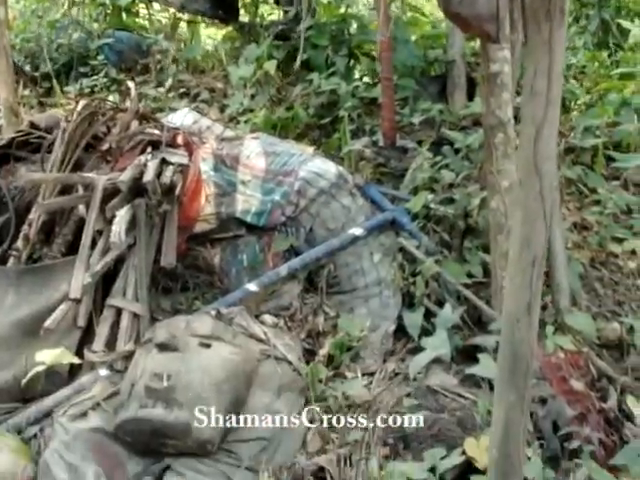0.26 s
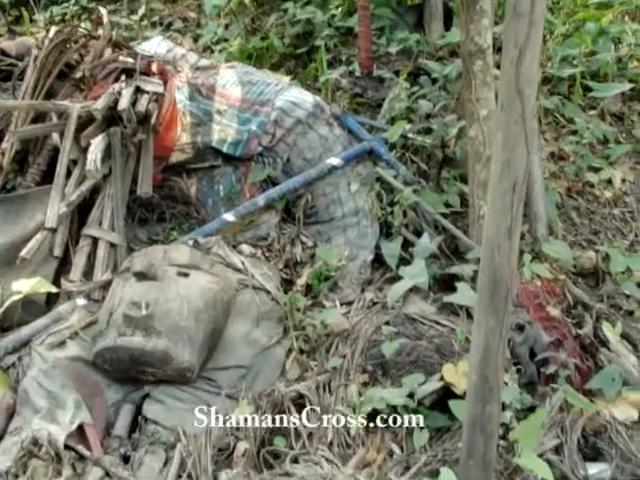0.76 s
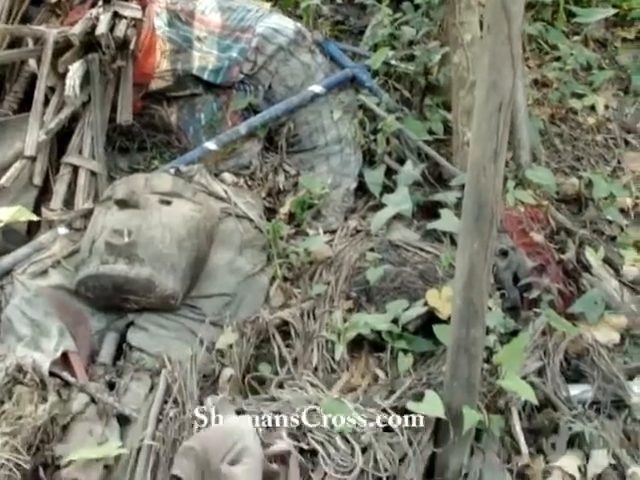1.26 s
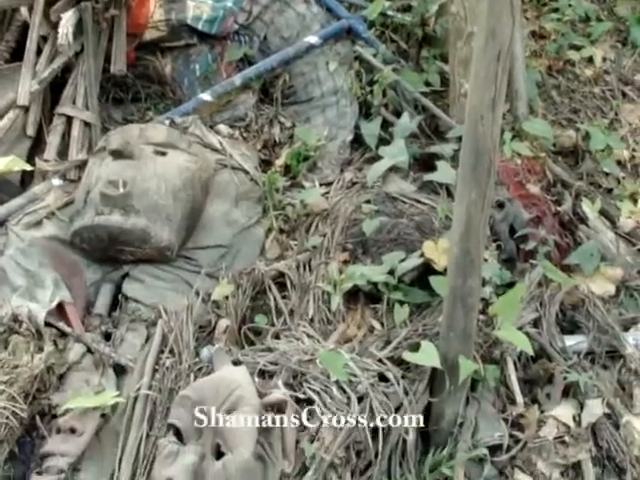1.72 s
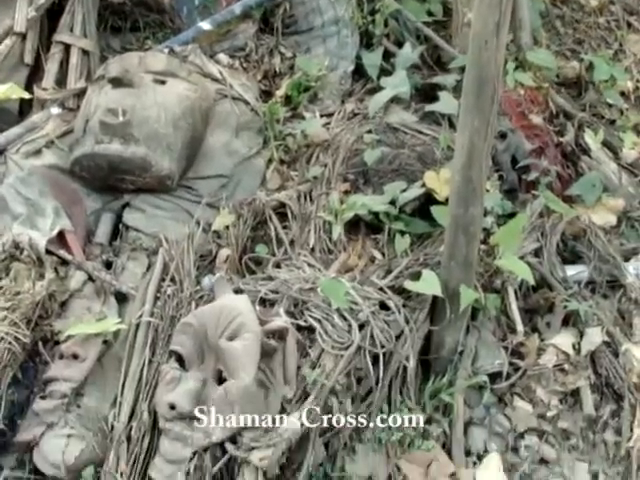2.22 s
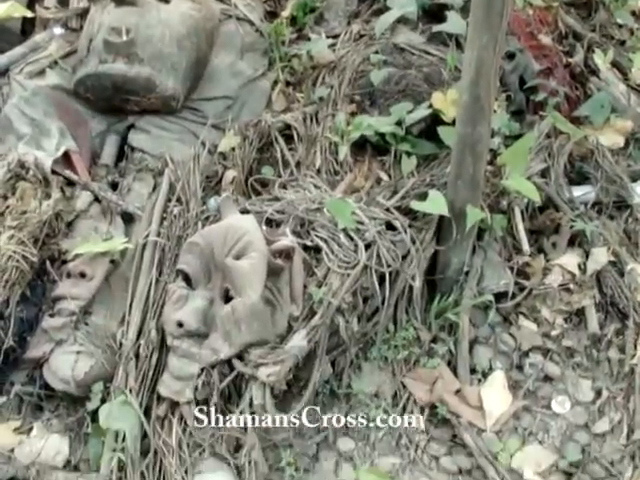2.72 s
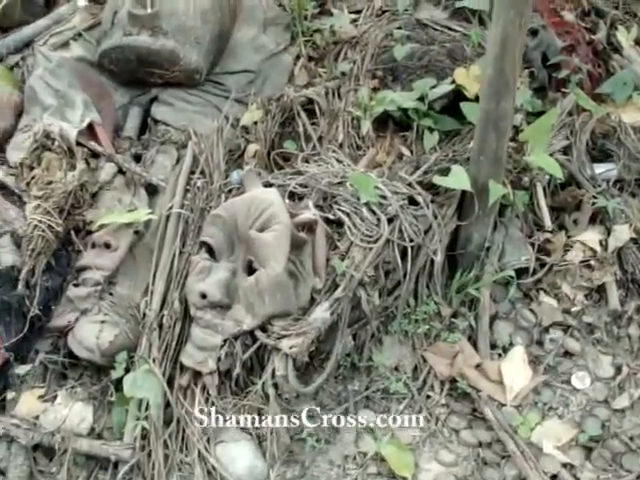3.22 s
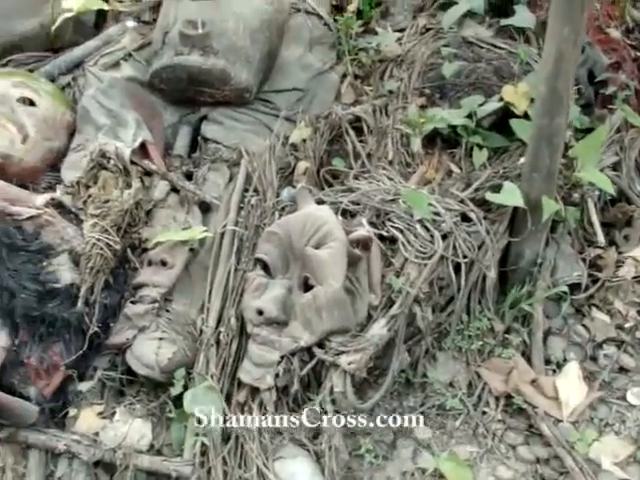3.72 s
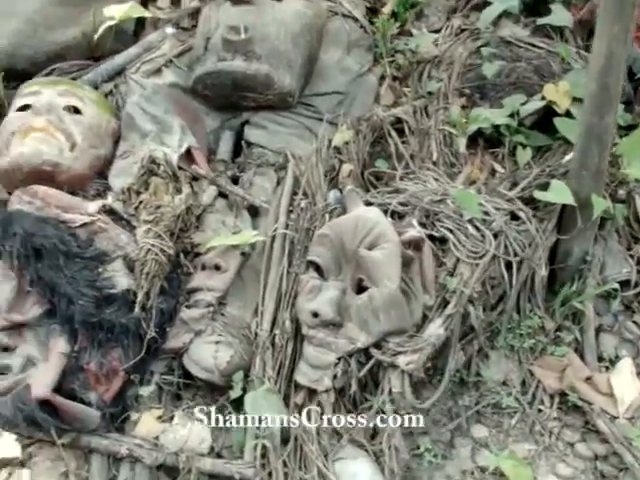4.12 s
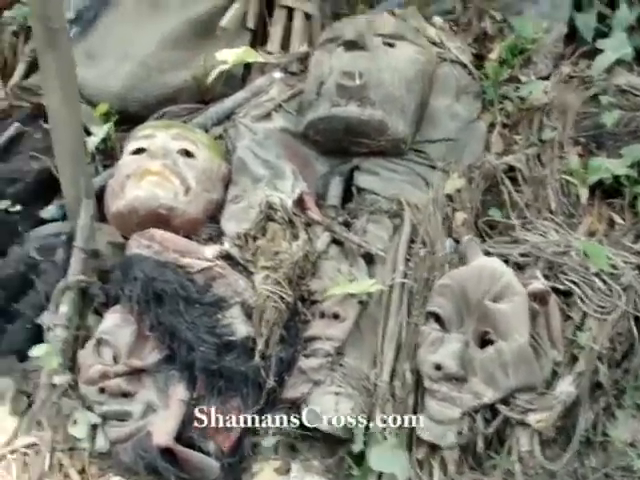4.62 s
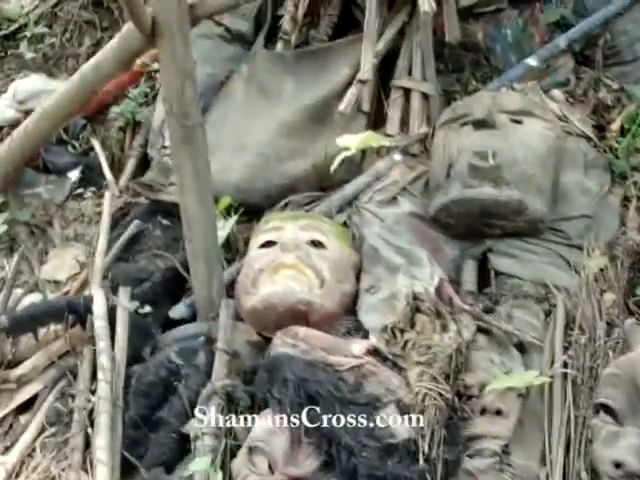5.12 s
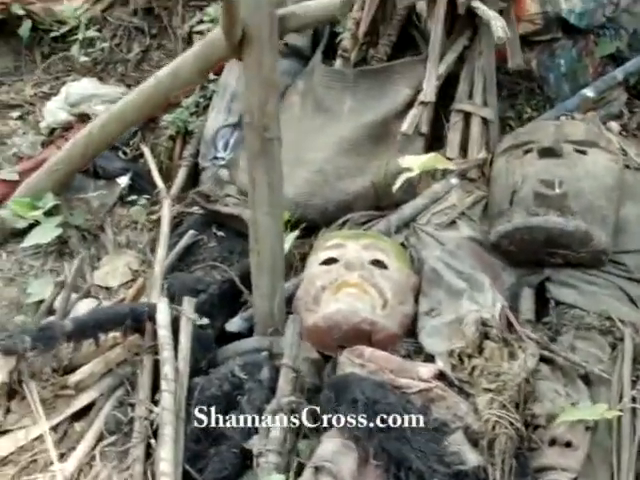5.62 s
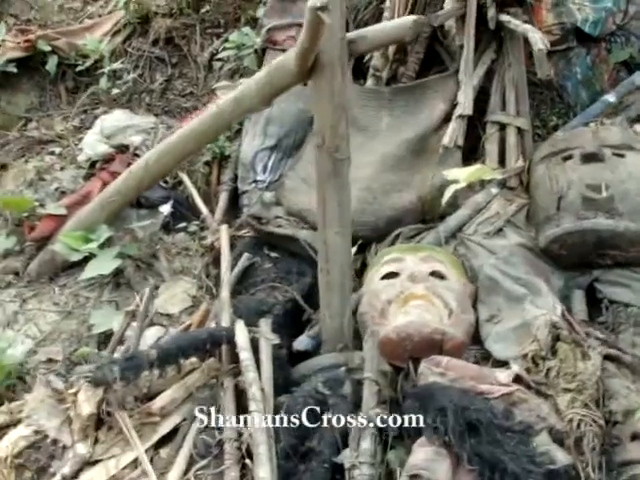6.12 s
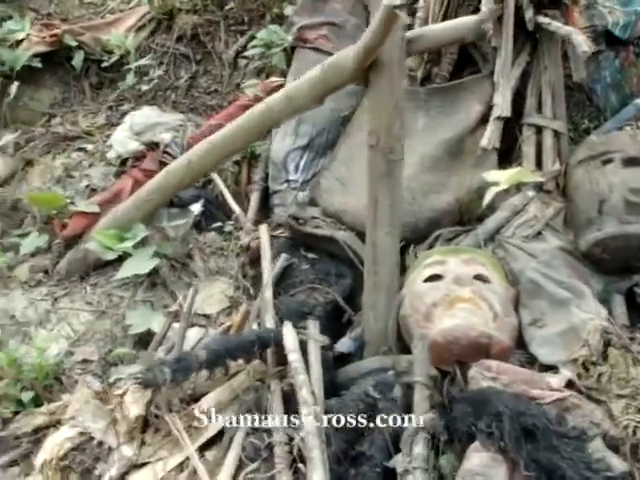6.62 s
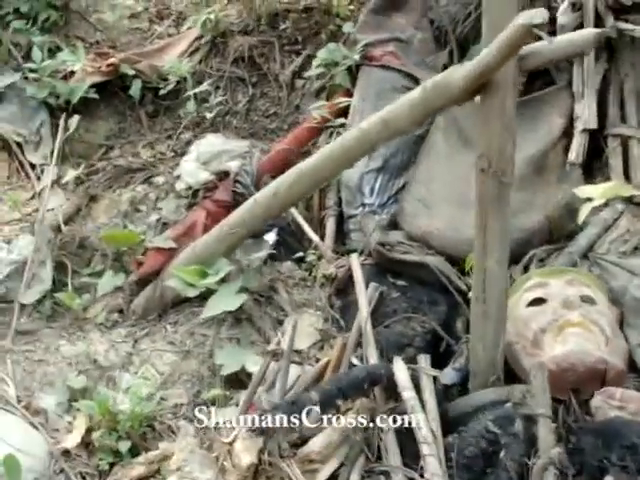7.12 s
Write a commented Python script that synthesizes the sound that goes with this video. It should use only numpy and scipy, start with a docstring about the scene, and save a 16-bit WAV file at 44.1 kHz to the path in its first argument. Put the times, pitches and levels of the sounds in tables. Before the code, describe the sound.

A bird repeats clear falling whistles outdoors while others warble and a near one squawks, with low wind thumps over soft leaf hiss.

```python
"""Birds in leafy undergrowth

A bird repeats a falling whistle, others warble and sweep, and a near one squawks and chips.
Whistles are wavering near sines, harsh calls are jittered harmonics, and sparse echoes scatter both.
A light breeze thumps a small handheld microphone in low puffs over the shaped noise of leaves.
An insect band is throbbing narrow noise, a faint buzz is evenly spaced rings, twig ticks are brief bursts."""
import sys
import numpy as np
from scipy import signal
from scipy.io import wavfile
from scipy.ndimage import uniform_filter1d

SR = 44100
rng = np.random.default_rng(int(sys.argv[2]) if len(sys.argv) > 2 else 0)


def bounce(signal):
    """Save signal as a 16-bit WAV file at the path given by the first command-line argument."""
    frames = np.transpose(np.atleast_2d(signal))
    limited = np.clip(frames, -1, 1)
    pcm = np.round(limited * 32767).astype(np.int16)
    wavfile.write(sys.argv[1], SR, pcm)


N = 324576

# Falling whistles. Each row: start in seconds, length in seconds, top pitch in Hz,
# level in dB before onset and drop, duration of the loud part in seconds.
FALLING_WHISTLES = [(-.13, 0.25, 3427, -33.5, 0.14), (0.272, 0.27, 3383, -34.5, 0.16),
                    (0.681, 0.21, 3320, -35.5, 0.13), (1.221, 0.19, 3370, -50, 0.11),
                    (3.419, 0.28, 3410, -51, 0.11), (3.816, 0.23, 3280, -40.5, 0.11),
                    (4.209, 0.249, 3250, -35, 0.1), (4.621, 0.27, 3347, -36.5, 0.12),
                    (5.035, 0.14, 3324, -38, 0.098)]
FALL_END_HZ, FALL_SETTLE_S = 2727, 0.12  # limit and time constant of the glide
FALL_DROP_DB = 12.5  # softer after the loud part

# Warbled notes. Each row: start in seconds, length in seconds, first, middle and last pitch in Hz,
# level in dB at the middle, swell in dB from first to last.
WARBLED_NOTES = [(0.745, 0.14, 1690, 1720, 1675, -60.5, 10), (2.552, 0.046, 2310, 2410, 2200, -51.5, -8),
                 (3.064, 0.07, 2780, 2543, 2580, -45, -3), (3.501, 0.093, 2220, 1950, 2500, -53, 3),
                 (3.803, 0.16, 2295, 2365, 2270, -52.5, 3), (3.927, 0.077, 2286, 2120, 2370, -50.5, -3),
                 (4.511, 0.12, 1301, 1617, 1824, -52, -7), (4.6, 0.23, 1790, 1797, 1603, -47.5, -6),
                 (4.576, 0.09, 1816, 2120, 2300, -51.5, -1), (5.046, 0.071, 1710, 2110, 2580, -52.5, -11),
                 (5.303, 0.069, 2086, 2107, 2210, -51, -3), (5.398, 0.12, 2220, 2260, 2290, -55, -15),
                 (5.401, 0.11, 1950, 1990, 1960, -54, 3), (5.474, 0.34, 3915, 3470, 3105, -58, -13),
                 (5.816, .21, 3090, 3050, 2830, -57, 13), (5.829, 0.051, 1740, 1850, 1560, -47, -2),
                 (5.945, 0.063, 2155, 1904, 2220, -45.5, 4), (6.004, 0.056, 2095, 2380, 2360, -47.5, 13),
                 (6.121, 0.028, 1950, 1990, 2180, -48, 17), (6.148, 0.052, 2618, 2673, 2390, -35, 7),
                 (6.286, 0.06, 1930, 1720, 2070, -47.5, 3), (6.353, 0.065, 2030, 2118, 1873, -40.5, 1),
                 (6.404, .022, 4350, 4430, 4120, -49, -1), (6.434, 0.097, 2010, 2394, 2360, -47, -16),
                 (6.631, 0.061, 1576, 1706, 1650, -54, -9), (6.812, 0.066, 2950, 3115, 3405, -49.5, 17),
                 (6.875, .075, 3380, 3360, 3400, -55.5, 0), (6.858, 0.056, 1600, 1724, 1550, -51, 5),
                 (7.03, 0.12, 2510, 2765, 3130, -50, 10), (7.147, 0.09, 3034, 3210, 3250, -47, -20),
                 (7.186, 0.052, 2236, 1950, 1580, -47.5, 4), (7.228, 0.11, 3950, 3700, 3570, -53.5, 0)]
NOTE_ENDS_DB = 0.5  # both ends are raised this much over the middle, apart from the swell

# Distant sweeps and peeps. Each row: start in seconds, length in seconds, from Hz, to Hz, level in dB.
DISTANT_SWEEPS = [(-.01, 0.029, 4920, 6570, -47), (0.228, 0.036, 4400, 6660, -49.5),
                  (0.458, 0.05, 4400, 6580, -52), (0.643, 0.025, 4380, 5760, -51.5),
                  (0.663, .045, 4700, 3400, -53), (0.934, 0.033, 4600, 6170, -52),
                  (1.14, 0.041, 3750, 6540, -51), (1.298, 0.035, 3900, 6500, -53),
                  (1.482, 0.051, 4290, 6800, -52.5), (4.735, 0.06, 5050, 6100, -54),
                  (0.314, 0.14, 2045, 2030, -56), (0.413, .13, 2250, 2290, -58.5),
                  (1.019, 0.061, 3476, 3120, -56), (1.324, 0.056, 1925, 1950, -63),
                  (1.667, 0.028, 3990, 4010, -49.5), (1.764, 0.087, 2220, 2370, -58.5),
                  (1.959, 0.046, 3890, 4720, -56.5), (2.33, .05, 5170, 5800, -58),
                  (2.4, .07, 2240, 2160, -64), (3.026, 0.05, 2470, 2160, -54),
                  (4.883, 0.17, 6520, 6150, -68), (5.604, 0.097, 3190, 2980, -65.5),
                  (6.191, 0.11, 5250, 4860, -68), (6.817, 0.072, 5270, 5150, -62),
                  (6.924, 0.027, 2700, 2670, -58), (7.326, .04, 4900, 5500, -59)]
# Trills of five upstrokes. Each row: start in seconds, starting pitch in Hz, level in dB.
DISTANT_TRILLS = [(1.909, 2460, -54), (2.318, 2260, -51.5)]

# Strength of the breeze. Each row: time in seconds, relative puff level in dB.
BREEZE_STRENGTH = [(0, -68.5), (.25, -54.5), (.86, -80.5), (.95, -43.5), (1.7, -43), (2.6, -53),
                   (3.25, -58), (3.6, -45), (3.85, -53.5), (4.3, -44), (5.2, -53.5), (5.5, -59),
                   (5.65, -84), (6.0, -60), (6.2, -70), (6.62, -56), (6.85, -80), (7.2, -50.5), (7.36, -54)]
# Strong puffs. Each row: start in seconds, level of the first eddy in dB, cycle rate in Hz.
STRONG_PUFFS = [(1.026, -25.5, 133), (1.176, -15.5, 216), (1.429, -30.5, 167), (1.653, -24.5, 176),
                (1.716, -29, 173), (1.863, -33, 132), (1.914, -31, 153), (3.611, -27.5, 207),
                (3.697, -34, 181), (3.736, -29.5, 207), (4.47, -26.5, 140.5), (4.597, -29.5, 120),
                (4.786, -26.5, 155), (5.084, -35, 110), (5.44, -32, 165), (5.54, -32, 142),
                (5.91, -38.5, 132), (6.075, -33.5, 139.4), (6.328, -33.5, 131)]

# Spectrum of leaf hiss. Each row: frequency in Hz, relative spectral level in dB.
LEAF_SPECTRUM = [(730, 1.5), (1300, 3.5), (1740, 0), (2210, 2.5), (3000, -1.5), (5200, -5), (8400, -8.5),
                 (9000, -7)]
# Loudness of leaf hiss. Each row: time in seconds, level in dB.
LEAF_LEVEL = [(2.9, -53), (3.2, -54.5), (4.2, -54), (4.5, -50)]

INSECTS_HZ, INSECTS_WIDTH_HZ, INSECTS_DB = 9780, 390, -60.5  # centre, pole width, level before throbbing

# Strength of the buzz. Each row: time in seconds, level in dB before ring offset and scatter.
BUZZ_STRENGTH = [(2.9, -52), (3.1, -70), (4.3, -70), (4.5, -53)]
BUZZ_PER_S = 59.9

# Pitch path of the near squawk. Each row: time in seconds, pitch in Hz.
SQUAWK_PITCH = [(2.703, 1324), (2.73, 2011), (2.752, 3800), (2.76, 3790), (2.773, 1849), (2.791, 1530),
                (2.828, 1790), (2.842, 2368), (2.858, 3650), (2.878, 3983), (2.908, 3345), (2.945, 3195),
                (2.968, 1753), (2.993, 1220)]
# Effort at 2 kHz at the start, its growth with pitch, and its decline with time.
SQUAWK_DB, SQUAWK_DB_PER_OCTAVE, SQUAWK_FADE_DB_PER_S = -23.5, 2, 27.5
# Near chips. Each row: start in seconds, length in seconds, top pitch in Hz,
# effort in dB at the middle, roughness from 0 to 1.
NEAR_CHIPS = [(2.52, 0.03, 1018, -40.5, 0.5), (3.124, 0.031, 1118, -38.5, 0.33),
              (3.488, 0.045, 1060, -50.5, 0.83), (3.934, 0.046, 1162, -41.5, 0.5),
              (4.315, 0.056, 1120, -42.5, 0.56)]
# Beak weighting for the chips. Each row: frequency in Hz, gain in dB.
CHIP_BEAK = [(3300, -12), (4300, 8.5), (5600, -4), (7500, -10)]
# Beak weighting for the squawk. Each row: frequency in Hz, gain in dB.
SQUAWK_BEAK = [(2200, -18.5), (3700, -7), (4800, 4), (6200, 0), (7300, -10), (10000, -12.5)]

# Twig ticks. Each row: start in seconds, level in dB, cycle rate in Hz.
TWIG_TICKS = [(4.362, -31.5, 1340), (5.399, -31, 1370), (5.79, -32, 2200), (6.756, -32.5, 950),
              (6.782, -34, 1130)]

EDGE_HZ = 10150  # upper band limit


def amp(db):
    """Decibel law: twenty dB is a tenfold amplitude."""
    return 10 ** (np.asarray(db) / 20)


def evened(x):
    """Normalization of a signal to rms 1."""
    return x / np.sqrt(np.mean(x ** 2) + 1e-20)


def read(points, at):
    """Linear interpolation in a two-column table."""
    return np.interp(at, *np.transpose(points))


def add(mix, s, sound):
    """Superposition: adds a sound at s seconds, trimmed to the scene."""
    at = round(s * SR)
    part = mix[max(at, 0):][:len(sound) + min(at, 0)]
    part += sound[max(-at, 0):][:len(part)]


def wobble(length, size):
    """Smoothed noise: two moving averages of size samples leave a random drift near rms 1."""
    noise = rng.standard_normal(length + size)
    smooth = uniform_filter1d(uniform_filter1d(noise, size), size)
    return evened(smooth)[:length]


def whistle(hz, db, flutter_db=1.8, edge_s=0.0035, fuzz=0.002, overtone_db=-40):
    """Near-sinusoidal tone: pitch wavers, and level flutters as paths through the leaves interfere."""
    t = np.arange(len(hz)) / SR
    edges = np.clip(np.minimum(t, t[::-1]) / edge_s, 0, 1)
    level = amp(db + flutter_db * wobble(len(t), size=250)) * edges
    wavering_hz = hz * (1 + fuzz * wobble(len(t), size=120))
    phase = 2 * np.pi * np.cumsum(wavering_hz) / SR
    tone = np.sin(phase) + amp(overtone_db) * np.sin(2 * phase)
    return np.sqrt(2) * level * tone


def whistlers():
    """Gliding tones: pitch decays exponentially in the falls and bends as a parabola in the warbles."""
    mix = np.zeros(N)
    for s, length, top_hz, db, loud_s in FALLING_WHISTLES:
        t = np.arange(0, length, 1 / SR)
        hz = FALL_END_HZ + (top_hz - FALL_END_HZ) * np.exp(-t / FALL_SETTLE_S)
        onset_db = -20 * np.exp(-t / 0.02)
        drop_db = FALL_DROP_DB * np.clip((t - loud_s) / 0.049 + 0.5, 0, 1)
        add(mix, s, whistle(hz, db + onset_db - drop_db))
    for s, length, first_hz, middle_hz, last_hz, db, swell_db in WARBLED_NOTES:
        u = np.linspace(-1, 1, round(length * SR))
        bend_hz = (first_hz + last_hz) / 2 - middle_hz
        hz = middle_hz + (last_hz - first_hz) / 2 * u + bend_hz * u ** 2
        level_db = db + swell_db / 2 * u + NOTE_ENDS_DB * u ** 2
        # a throat resonance lifts the octave of one pitch range
        overtone_db = -12 - 50 * abs(np.log2(hz / 1780))
        add(mix, s, whistle(hz, level_db, fuzz=0.0068, overtone_db=overtone_db))
    return mix


def far_birds():
    """Linear frequency sweeps: single sweeps and peeps, and trills whose upstrokes climb ever less."""
    mix = np.zeros(N)
    for s, length, from_hz, to_hz, db in DISTANT_SWEEPS:
        hz = np.linspace(from_hz, to_hz, round(length * SR))
        add(mix, s, whistle(hz, db, fuzz=0.0072))
    for s, from_hz, db in DISTANT_TRILLS:
        for k in range(5):
            hz = from_hz * np.linspace(1, 1.6 - 0.138 * k, num=480)
            add(mix, s + 0.023 * k, whistle(hz, db, edge_s=0.0015))
    return mix


def thicket(x, t60, first_s):
    """Multiple scattering off trunks and leaves: decaying taps of random sign, blurred by stirring leaves."""
    taps = np.zeros(SR // 2)
    at = np.arange(0, len(taps) - 20, 20)
    at = at + rng.integers(0, 20, len(at))
    taps[at] = rng.choice([-1., 1.], len(at))
    t = np.arange(len(taps)) / SR
    taps *= amp(-60 * t / t60) * (t > first_s)
    taps /= np.linalg.norm(taps)
    echo = signal.hilbert(signal.oaconvolve(x, taps)[:N])
    # random phase drift blurs the echoed pitch
    return (echo * np.exp(1j * wobble(N, size=420))).real


def puff(hz, turns):
    """Windowed oscillation: a few cycles under a squared-sine envelope."""
    u = np.arange(0, turns, hz / SR)
    return np.sin(np.pi * u / turns) ** 2 * np.sin(2 * np.pi * u)


def wind():
    """Turbulence at the microphone: eddies make random low puffs, and stronger gusts shed quicker ones."""
    mix = np.zeros(N)
    breeze_db = read(BREEZE_STRENGTH, np.arange(N) / SR) + 2 * wobble(N, size=1200)
    for hz in np.geomspace(60, 340, num=9):
        size = amp(3.65 * np.minimum(rng.exponential(1, N), 3.5)) * rng.choice([-1, 1], N)
        octaves = np.log2(hz / 150)
        tilt_db = -5.5 * octaves ** 2 + 0.59 * (breeze_db + 44) * octaves
        struck = rng.random(N) < 16 / SR  # on average 16 puffs per second at each pitch
        train = size * struck * amp(breeze_db + tilt_db + 4)
        mix += signal.oaconvolve(train, puff(hz, turns=1.8))[:N]
    for s, db, hz in STRONG_PUFFS:
        eddy = -amp(db) * puff(hz, turns=2.09)
        add(mix, s, eddy)
        add(mix, s + 2.154 / hz, amp(-5.5) * eddy)  # a weaker second eddy follows each strong one here
        add(mix, s, amp(db - 18.5) * puff(3.1 * hz, turns=3.9))  # a brighter edge at the front
    return mix


def leaves():
    """Short-time spectral synthesis: random spectra with drifting patches make the hiss."""
    frames, hz = N // 128 + 5, np.fft.rfftfreq(512, 1 / SR)
    a, b, patches = rng.standard_normal((frames, 257, 3)).T
    patches = uniform_filter1d(patches, size=8, axis=0)  # across frequency
    patches = evened(uniform_filter1d(patches, size=20, axis=1))  # across time
    gain = amp(read(LEAF_SPECTRUM, hz)[:, None] + 2.2 * patches)
    spectra = (a + 1j * b) * gain * (hz < EDGE_HZ)[:, None]
    hiss = signal.istft(spectra, nperseg=512, noverlap=384)[1][:N]
    return amp(read(LEAF_LEVEL, np.arange(N) / SR)) * evened(hiss)


def insects():
    """Quadrature modulation: low-passed noise moved to a high band that throbs unevenly."""
    t = np.arange(N) / SR
    r = np.exp(-np.pi * INSECTS_WIDTH_HZ / SR)
    band = signal.lfilter([1], [1, -2 * r, r * r], rng.standard_normal((2, N)))
    turn = 2 * np.pi * INSECTS_HZ * t
    hum = band[0] * np.cos(turn) + band[1] * np.sin(turn)
    return amp(INSECTS_DB + 2.24 * wobble(N, size=300)) * evened(hum)


def buzz():
    """Periodic excitation: evenly timed ticks of uneven strength ring at two pitches."""
    s = np.arange(0.003, N / SR, 1 / BUZZ_PER_S)
    draws, mix = rng.standard_normal((len(s), 2)), np.zeros(N)
    for column, (hz, db) in enumerate([(1490, -2.0), (1153, -11)]):  # ring pitch, offset in dB
        train = np.zeros(N)
        train[(s * SR).astype(int)] = amp(read(BUZZ_STRENGTH, s) + db + 4 * draws[:, column])
        mix += signal.oaconvolve(train, puff(hz, turns=12.9))[:N]
    return mix


def rasp(hz, db, rough, beak):
    """Source and filter: harmonics of a jittering syrinx, weighted by the beak, blurred by air noise."""
    jittered_hz = hz * (1 + 0.016 * rough * wobble(len(hz), size=60))
    turns = np.cumsum(jittered_hz) / SR
    out = np.zeros(len(hz))
    for k in range(1, 10):
        blur = 1 - rough + rough * wobble(len(hz), size=24)
        weight = amp(read(beak, k * hz)) * (k * hz < EDGE_HZ)
        out += weight * blur * np.sin(2 * np.pi * k * turns)
    return amp(db) * out


def near_bird():
    """Harmonic voice: a squawk glides and tires, and chips climb to a held pitch as effort falls."""
    mix = np.zeros(N)
    s, hz = np.transpose(SQUAWK_PITCH)
    t = np.arange(s[0], s[-1], 1 / SR)
    pitch = uniform_filter1d(np.exp(np.interp(t, s, np.log(hz))), size=200)
    octaves = np.log2(pitch / 2000)
    effort_db = SQUAWK_DB + SQUAWK_DB_PER_OCTAVE * octaves - SQUAWK_FADE_DB_PER_S * (t - s[0])
    voice = rasp(pitch, effort_db, rough=0.27, beak=SQUAWK_BEAK)
    add(mix, s[0], voice * signal.windows.tukey(len(t), 0.11))
    for s, length, top_hz, db, rough in NEAR_CHIPS:
        u = np.linspace(-1, 1, round(length * SR))
        pitch = top_hz * (1 - 0.145 * u ** 2 * (u < 0))  # rises to the middle, then holds
        voice = rasp(pitch, db - 1.7 * u, rough, CHIP_BEAK)
        add(mix, s, voice * signal.windows.tukey(len(u), 0.3))
    return mix


def twigs():
    """Heavily damped oscillation: dry ticks of about two cycles."""
    mix = np.zeros(N)
    for s, db, hz in TWIG_TICKS:
        add(mix, s, amp(db) * puff(hz, turns=2.4))
    return mix


def scene():
    """Superposition of birds and their scatter, strongest for the far ones, with all other sources."""
    mid, far, near = whistlers(), far_birds(), near_bird()
    birds = mid + amp(-6.5) * thicket(mid, t60=0.49, first_s=0.0034)
    birds += far + amp(-1) * thicket(far, t60=0.2, first_s=0.006)
    birds += near + amp(-5) * thicket(near, t60=0.42, first_s=0.003)
    return (birds + wind() + leaves() + insects() + buzz() + twigs())[None]


def record(dry):
    """Linear filtering: the microphone's bass roll-off, then the upper band limit."""
    bass_cut = signal.butter(2, 65, "highpass", fs=SR, output="sos")
    thin = signal.sosfilt(bass_cut, dry)
    band_limit = signal.firwin(511, EDGE_HZ, window=("kaiser", 9), fs=SR)
    return signal.oaconvolve(thin, band_limit[None], "same")


dry = scene()
out = record(dry)
bounce(out)
```